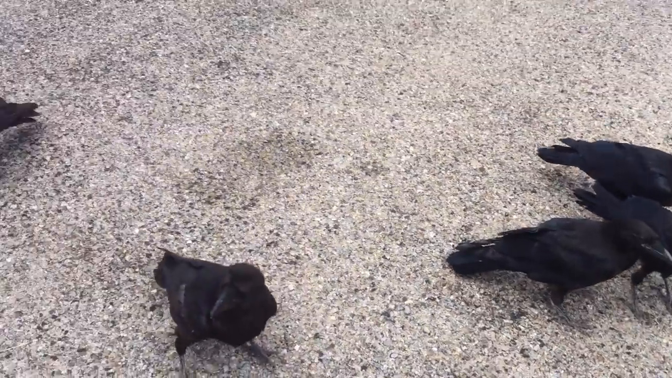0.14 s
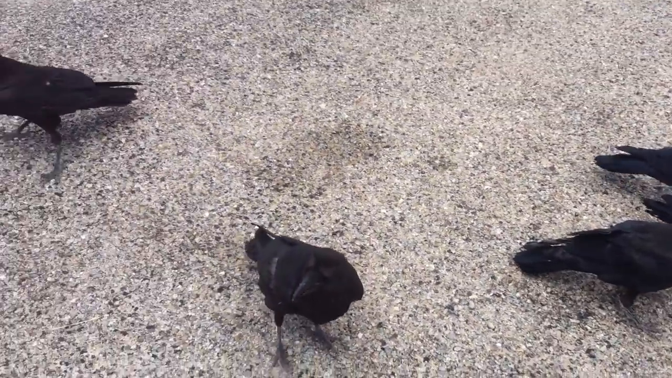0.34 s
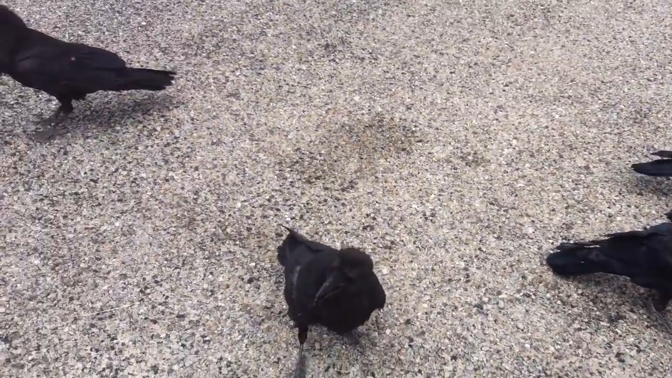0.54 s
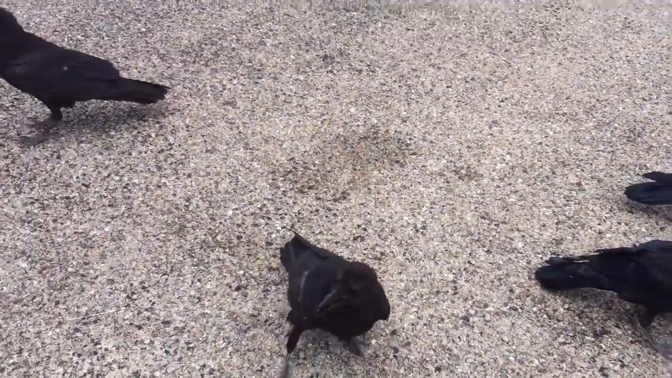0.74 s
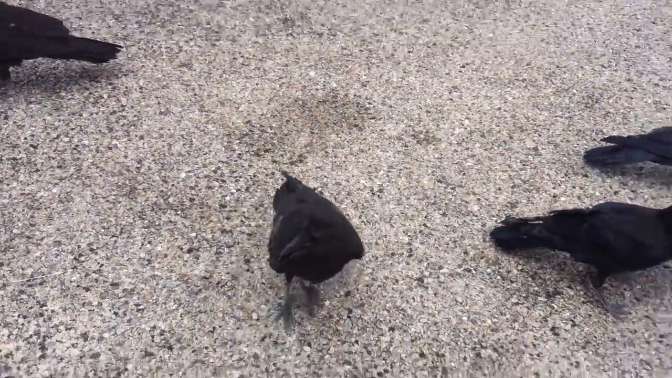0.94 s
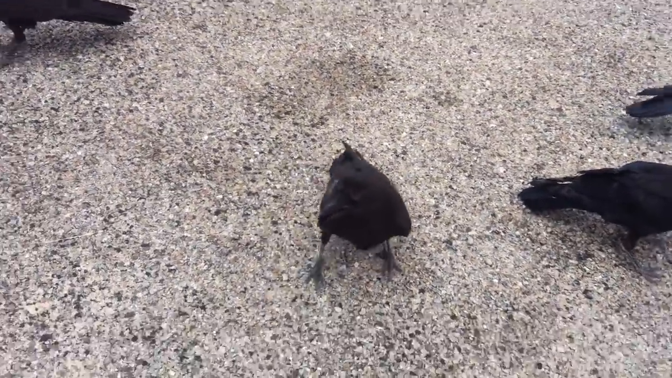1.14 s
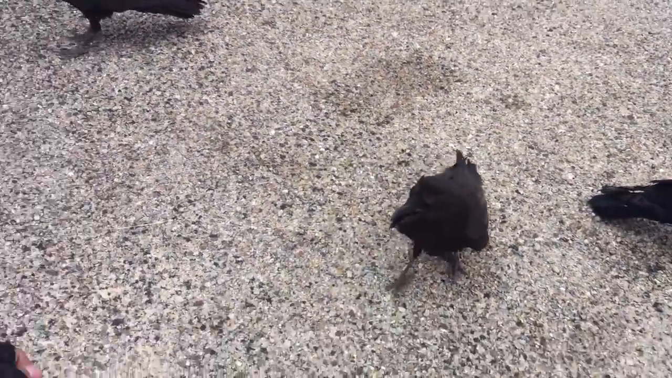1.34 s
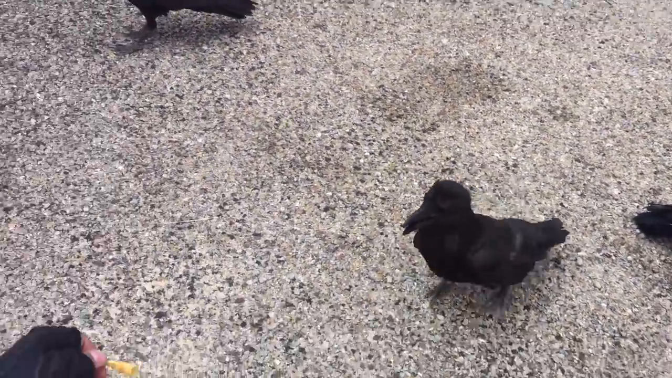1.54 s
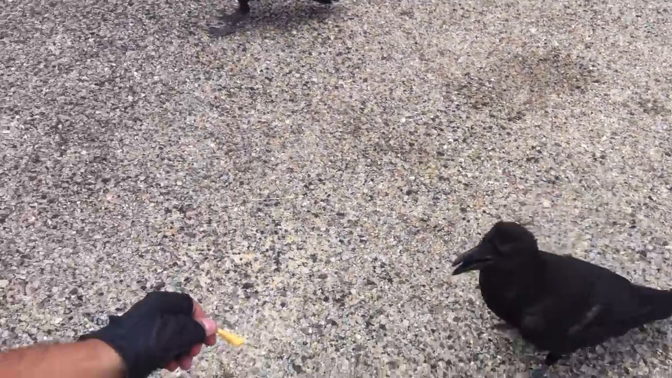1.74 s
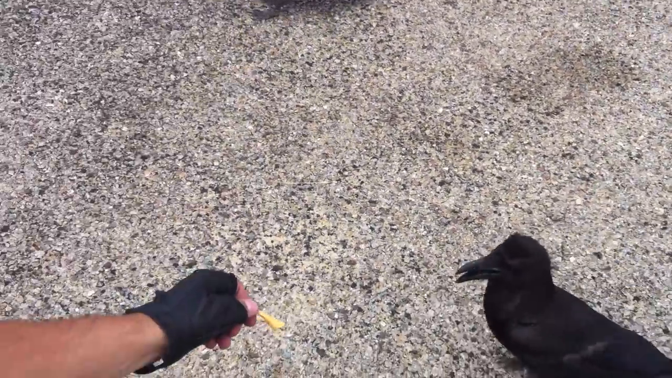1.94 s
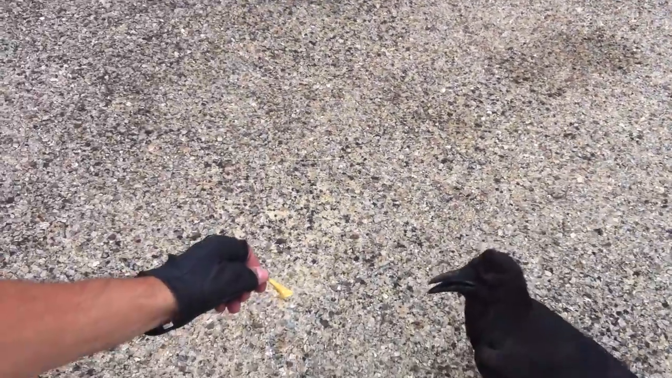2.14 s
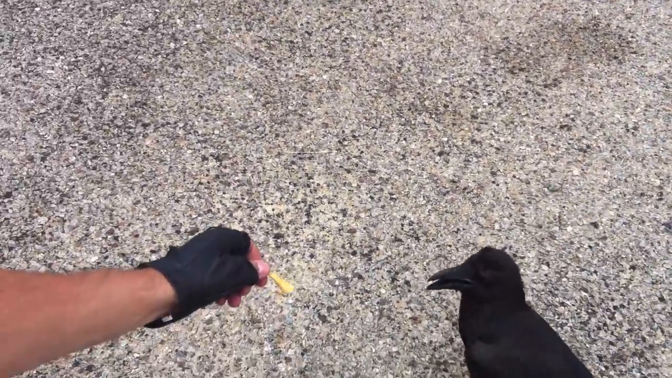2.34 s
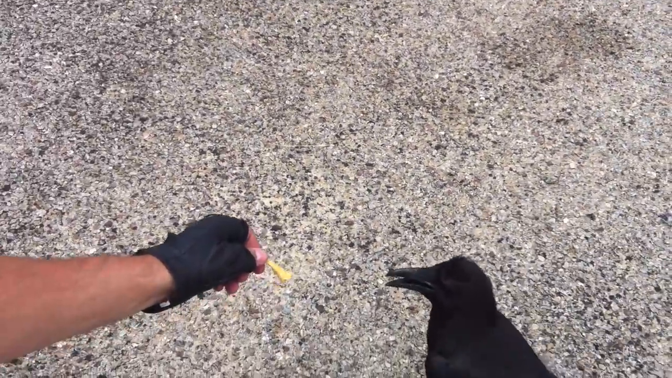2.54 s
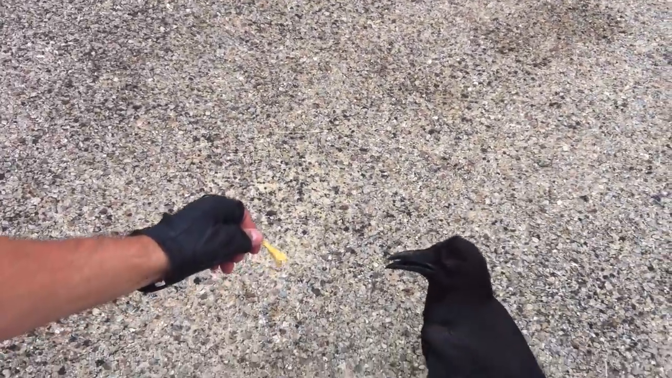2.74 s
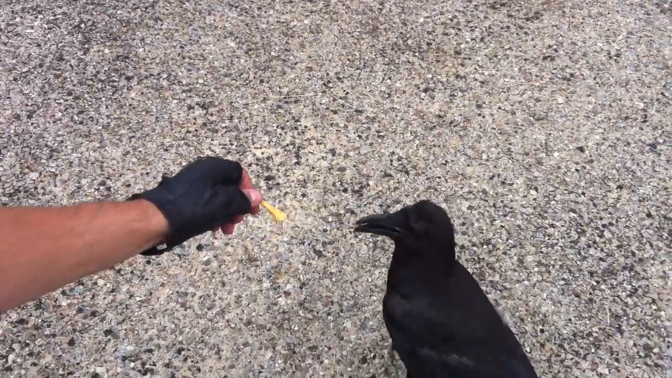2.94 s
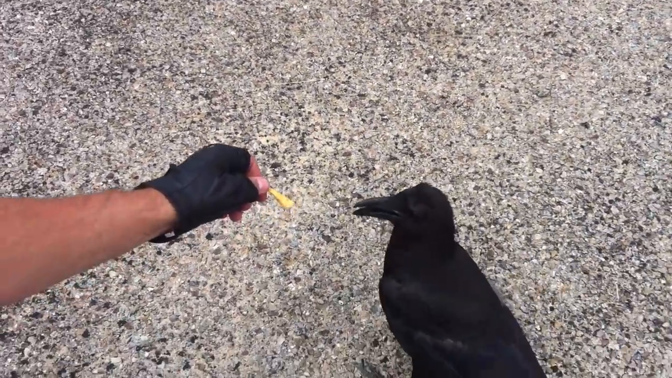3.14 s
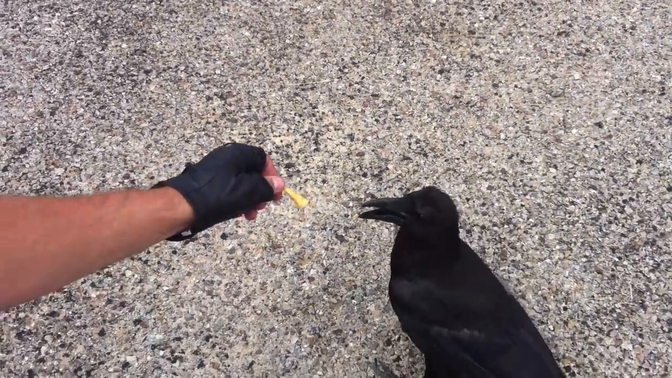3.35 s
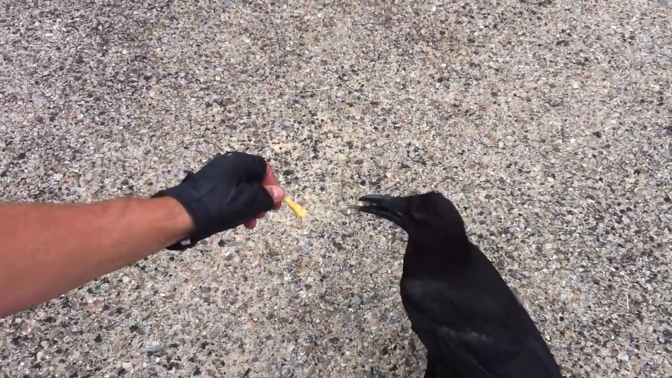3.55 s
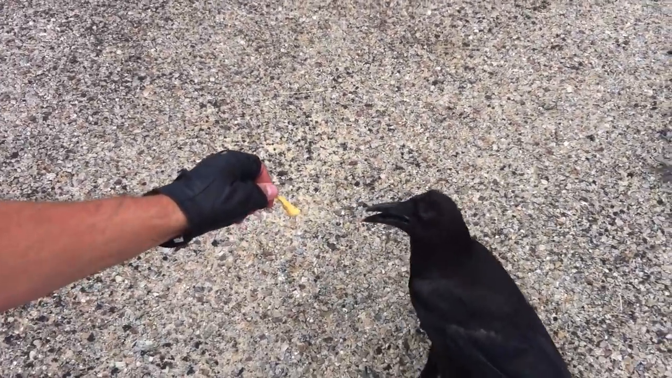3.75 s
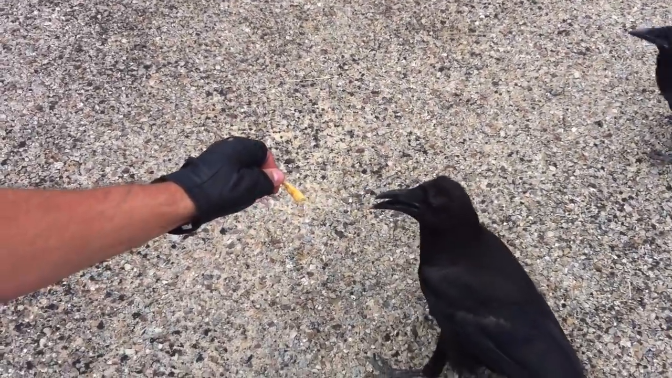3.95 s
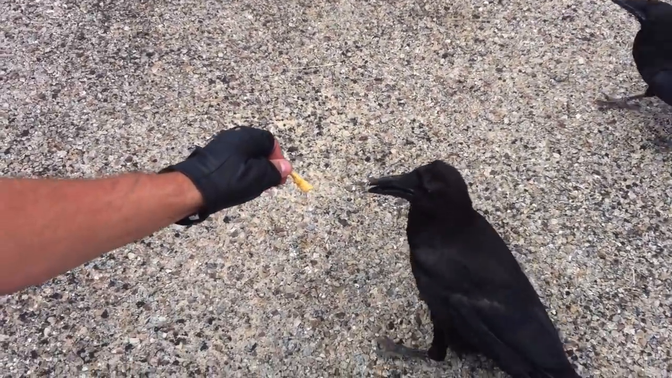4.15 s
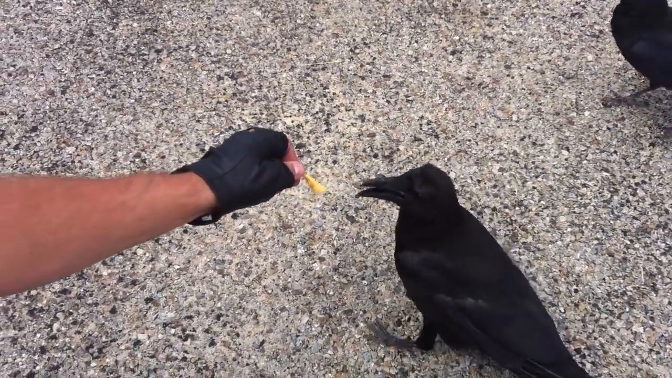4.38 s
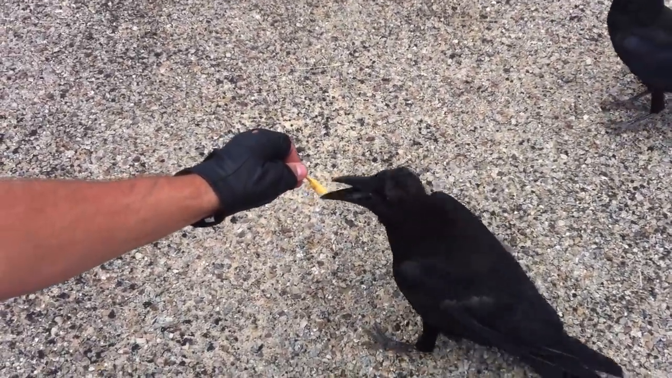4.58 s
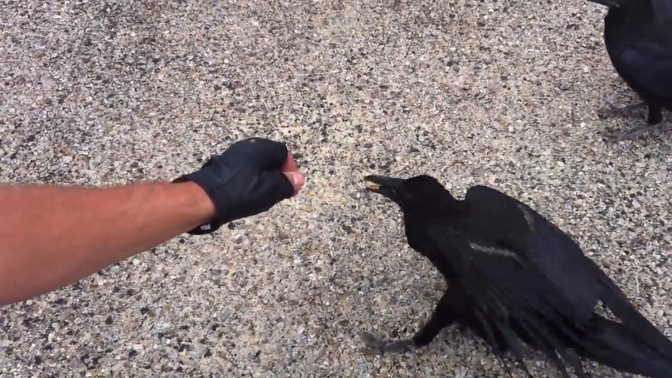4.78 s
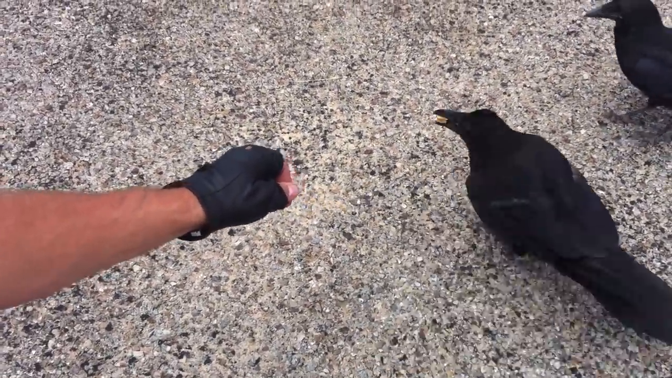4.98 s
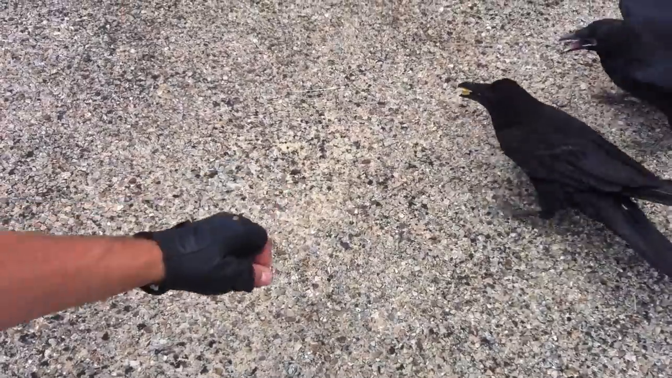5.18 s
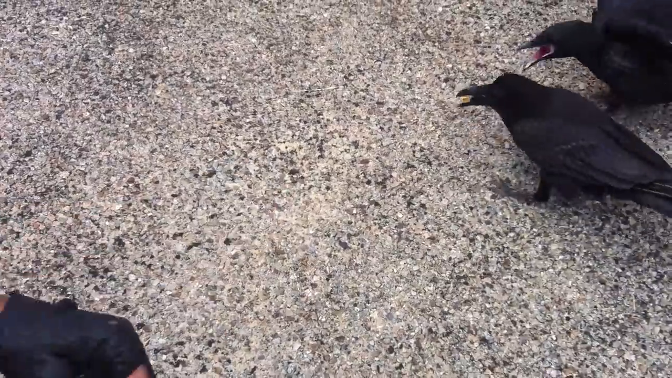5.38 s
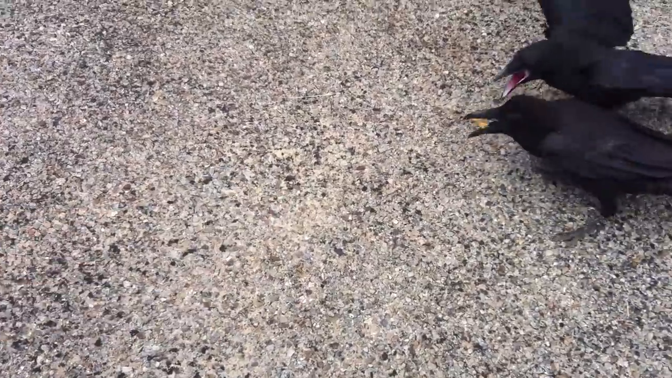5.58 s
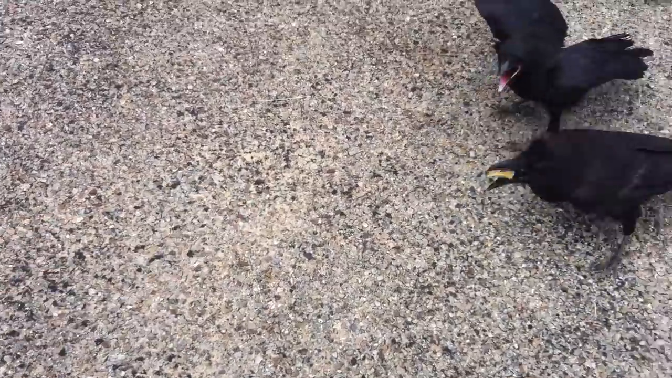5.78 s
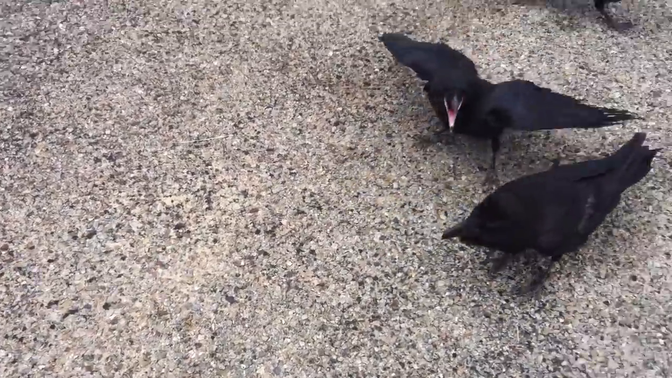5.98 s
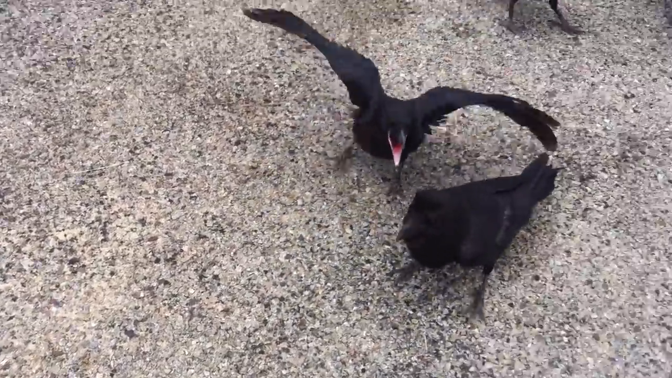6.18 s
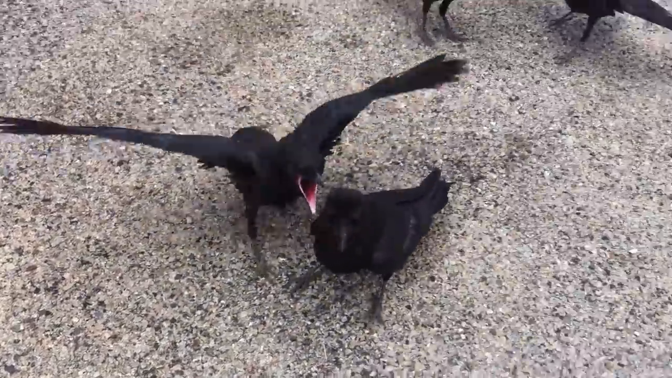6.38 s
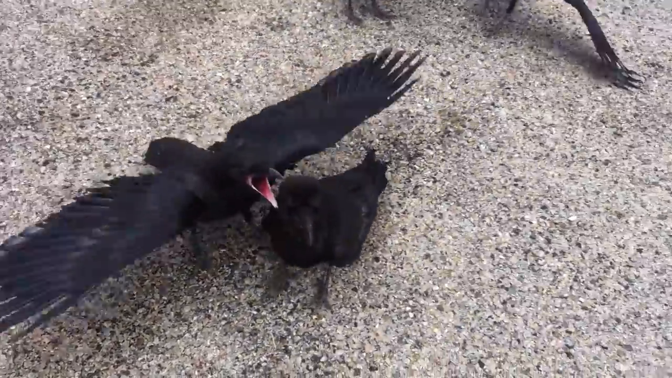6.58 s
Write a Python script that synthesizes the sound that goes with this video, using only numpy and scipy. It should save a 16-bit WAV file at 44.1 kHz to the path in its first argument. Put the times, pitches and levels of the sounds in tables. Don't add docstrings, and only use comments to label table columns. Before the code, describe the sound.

Quiet claw taps and feather rustles on outdoor grit, broken by three loud, hoarse raven caws and a brief scuffle before the final swelling cry.

```python
import sys
import numpy as np
from scipy import signal
from scipy.fft import rfft, irfft
from scipy.io import wavfile
from scipy.ndimage import uniform_filter1d, minimum_filter1d, map_coordinates

SR = 44100
rng = np.random.default_rng(int(sys.argv[2]) if len(sys.argv) > 2 else 0)


def boost(x):
    u = np.asarray(x, float) / 20
    return 10 ** u


def int16_out(signal):
    q = np.round(np.clip(np.atleast_2d(signal).T, -1, 1) * 32767)
    wavfile.write(sys.argv[1], SR, q.astype(np.int16))


N = 291942

# pitch_hz, level_db
HUSH_COLOUR = [(18, -68.5), (30, -34), (65, -32), (91, -17.5), (213, -3.5), (301, -9), (344, -8),
               (460, -11.5), (1440, -12.5), (4500, -15), (16900, -17)]
# start_s, level_db
GUST_LEVELS = [(0, -70.5), (.72, -78), (1.31, -70), (1.49, -75), (2.38, -77), (3.9, -80.5), (4.61, -83),
               (4.9, -69), (5.2, -75), (5.75, -67), (5.85, -60), (6.12, -58), (6.27, -53), (6.5, -67),
               (6.62, -43)]
# pitch_hz, level_db
GUST_COLOUR = [(41, -51.5), (70, -19.5), (117, -9.5), (215, -1), (495, -3), (626, -3), (900, -10),
               (1170, -33), (1980, -120)]
# start_s, pitch_hz, level_db
MOTOR_HUM = [
    (0, 525, -75),
    (.4, 515.5, -74.5),
    (.8, 513, -76),
    (1.0, 507, -84),
]
# start_s, length_s, level_db, edge_s
FAR_CAW = (2.7, .18, -68, .06)
# start_s, rise_s, length_s, peak_db, slope_db_per_s after the peak
RUSTLES = [
    (0, 0.016, 0.25, -62.5, -31),
    (4.739, 0.13, .56, -58, -36.5),
    (5.791, 0.078, .46, -53, 11),
]
# pitch_hz, level_db
FEATHER_COLOUR = [(59, -22), (100, -9), (338, -2), (778, -12), (865, 3.5), (1050, -0.5), (1640, 0),
                  (3780, -3), (11700, -2.5), (16500, -6.5)]
# start_s, peak_db, tip_db (extra ring of the beak tip)
BEAK_CLACKS = [
    (0.0229, -54, -11.5),
    (2.0014, -43, -31),
    (3.1683, -44.5, -29),
    (4.5987, -44.5, -21.5),
    (4.7858, -42, -6),
    (4.8018, -60, -10),
]
# pitch_hz, level_db, longest t60_s (held to 32 / pitch_hz s at most)
BEAK_RING = [(1394, -8, 0.12), (1800, 0.5, 0.19), (3470, -3.5, 5.0), (4360, -6, 0.13), (6848, -20, 0.075),
             (8460, -15, 0.069), (8670, 1, 0.46), (9260, 12, 0.36), (12300, -0.5, 0.45)]
# low_hz, high_hz
BEAK_TIP_BAND = (3800, 4500)
# start_s, thud_db, knock_db, fizz_db
FOOTSTEPS = [(.049, -64, -51, -62), (0.073, -45.5, -48, -47.5), (.136, -37.5, -42, -58),
             (0.149, -40, -32, -35.5), (.169, -36, -41, -50), (0.22, -67, -52.5, -69),
             (.269, -53, -68, -65), (.37, -76, -49.5, -65), (.452, -51, -52.5, -68), (.734, -55, -78, -64),
             (.827, -42, -46.5, -47.5), (.851, -49.5, -65, -66), (.913, -41, -39.5, -72),
             (.922, -41.5, -65, -50), (1.312, -42.5, -50.5, -49), (2.217, -77, -51, -74),
             (2.229, -52, -50, -64), (4.742, -53, -42, -49)]
# start_s, fizz_db
CLAW_SCRATCHES = [(0.692, -53), (1.489, -50.5), (1.561, -51.5), (1.624, -41), (1.789, -50), (1.849, -53),
                  (1.981, -47.5), (2.185, -47), (2.286, -49.5), (2.343, -47.5), (2.552, -50.5),
                  (2.997, -45.5), (3.03, -40.5), (4.38, -43), (4.508, -47), (4.516, -47.5), (4.666, -45),
                  (4.675, -47.5), (4.775, -45), (4.784, -31), (4.802, -37), (4.959, -40.5), (4.974, -47),
                  (5.124, -45), (5.181, -49), (5.231, -51.5)]
# start_s, knock_db, fizz_db
SCUFFLES = [(5.817, -40, -43.5), (5.867, -43, -46), (5.881, -38.5, -34), (5.92, -51, -34.5),
            (5.957, -49.5, -31.5), (5.965, -39, -57), (6.007, -46, -32.5), (6.02, -36.5, -30),
            (6.046, -38, -52), (6.154, -38.5, -34.5), (6.21, -36, -32.5), (6.242, -40, -34)]
# time_s, level_db
CAW_LOUDNESS = [
    [(3.345, -127), (3.355, -36.5), (3.387, -21), (3.477, -18), (3.617, -18.5), (3.733, -20),
     (3.759, -35.5), (3.775, -72)],
    [(5.41, -112), (5.418, -35.5), (5.444, -20), (5.494, -18.5), (5.748, -18), (5.772, -25.5), (5.79, -56)],
    [(6.19, -71), (6.21, -49), (6.277, -36), (6.288, -26), (6.325, -19.5), (6.424, -13), (6.62, -12)],
]
# high_opens_s, both_close_s, high_hz, low_opens_s, low_hz
VOICE_SIDES = [
    (3.346, 3.751, 988.6, 3.35, 807.7),
    (5.41, 5.773, 985.8, 5.38, 807.3),
    (6.36, 6.9, 975.3, 6.27, 802.8),
]
# flutter_hz at the start, slowing_hz_per_s, high_over_low_db, bright_db above 2 kHz
CAW_MANNER = [
    (82.63, 24, -2, -6),
    (77.82, 20.4, 0.5, -4),
    (85.86, 60, 0, -4.5),
]
CAW_ROUGHNESS = [.22, .33, .38]
# depth_nepers, swing_hz, second_beat_share, loudness_lag_rad
CAW_FLUTTER = [(.5, 26, .1, .9), (.55, 34, .3, .9), (.35, 40, .2, .9)]
LOW_ORDERS = [(1, 0), (0, 1), (0, 2), (1, 1), (2, 0), (0, 3)]
LOW_TONES = [(-1.5, -18.5, -9.5, -16.5, -8.5, -24), (-6, -24, -5, 0, -3, -24),
             (-5.5, -14.5, -2, -2, -1.5, -30)]
UPPER_ORDERS = [(1, 2), (2, 1), (3, 0), (0, 4), (1, 3), (2, 2), (4, 0), (1, 4), (2, 3), (4, 1), (0, 6),
                (5, 0), (2, 4), (5, 1), (6, 0), (4, 3), (6, 1), (7, 0), (7, 1), (8, 0)]
UPPER_TONES = [(-5, 3, -2, -12.5, -6, -4, -1, 7.5, -11, -9.5, 6, -1.5, 8.2, 2, -2, 1, -3, -3.5, -10.5, 4.5),
               (-7, 6, 0, -2, -30, -7, 2, -2, 2, 5, -1.5, -5, 4.3, -8, -5.5, -2, -15, -12, -11, -2),
               (7, 3.5, -39, 1.5, -15, -1.5, 0, 6, -24.5, 1, 3, -2, 7.7, 6.5, -15, 0.5, 1, 6.5, -2, 6)]
# pitch_hz, level_db
WINDPIPE = [(400, -60), (620, -33), (740, -9), (820, 0), (1120, -1.5), (1260, -7), (1400, -1.5),
            (2050, -2.5), (2300, -6.5), (2700, -5), (3500, -36.5)]
# pitch_hz, level_db
UPPER_THROATS = [
    [(1290, -38.5), (2200, -6.5), (3020, -5), (3280, 2.5), (3770, -9), (4240, -5), (5130, -10.5),
     (6470, -12.5), (7090, -19.5), (8240, -17), (9330, -27.5), (16000, -42)],
    [(1290, -49.5), (2200, -9), (2510, -13), (2750, -4.5), (3120, 4.5), (4100, -13), (4720, -2), (5170, -8),
     (6010, -4), (6640, -13.5), (10200, -23.5), (16000, -34.5)],
    [(1290, -28.5), (2200, -9), (2710, -1.5), (3330, -4), (4030, -2.5), (4720, -4), (6530, -11),
     (7150, -13), (9560, -15), (11000, -18), (14600, -29.5), (16000, -64)],
]
# time_s, extra_path_ms, strength (0-1)
GRAVEL_BOUNCE = [
    [(3.34, 1, 0.5), (3.45, .94, 0.93), (3.6, 0.884, 0.1), (3.78, 0.88, 0.66)],
    [(5.4, 0.93, 0.2), (5.5, 0.89, 0.46), (5.63, 0.82, 0.33), (5.8, 0.83, 0)],
    [(6.18, 0.574, 0.44), (6.4, 0.63, 0.14), (6.48, .8, 0), (6.63, 0.75, 0.15)],
]
# delay_s, level_db, t60_s
WALL_RETURNS = [
    (0.25, -43, 0.45),
    (0.019, -35, 0.74),
]

HIGH_SLACK_HZ, HIGH_TIGHTEN_S, LOW_SLACK_HZ, LOW_TIGHTEN_S = 199.85, 0.068, 155.16, 0.11
SHUT_SAG_HZ, SHUT_S, LOW_SHUT_SHARE, MOST_SAG_HZ = 224, 0.029, 0.42, 302.6


def evened(x):
    return x / np.sqrt(np.mean(abs(x) ** 2) + 1e-20)


def steady(x):
    power = uniform_filter1d(uniform_filter1d(x ** 2, size=1500), size=1500)
    return x / np.sqrt(power + 1e-12)


def add(mix, start_s, sound):
    part = mix[max(round(start_s * SR), 0):][:len(sound)]
    part += sound[:len(part)]


def noise(size):
    return rng.standard_normal(size)


def coloured(x, points):
    hz, db = np.transpose(points)
    f = np.fft.rfftfreq(len(x), 1 / SR)
    curve_db = np.interp(np.log(f + 1), np.log(hz + 1), db, -90, -90)
    return irfft(rfft(x) * boost(curve_db), len(x))


def band(x, low_hz, high_hz):
    edges = [low_hz, min(high_hz, SR / 2.1)]
    return signal.sosfilt(signal.butter(2, edges, "band", fs=SR, output="sos"), x)


def wander(size, hz):
    r = np.exp(-2 * np.pi * hz / SR)
    z = noise(size) + 1j * noise(size)
    once = signal.lfilter([1], [1, -r], z)
    return evened(signal.lfilter([1], [1, -r], once))


def turning(hz):
    return 2 * np.pi * np.cumsum(hz) / SR


def along(rows):
    s, *columns = np.transpose(rows)
    t = np.arange(s[0], s[-1], 1 / SR)
    return t, [np.interp(t, s, column) for column in columns]


def air(caws):
    flicker = boost(0.95 * wander(N, 30).real)
    out = boost(-65.5) * evened(coloured(noise(N) * flicker, HUSH_COLOUR))

    s, db = np.transpose(GUST_LEVELS)
    wind = boost(np.interp(np.arange(N) / SR, s, db) - 2.0)
    puffs = boost(-47.5) * np.sqrt(abs(uniform_filter1d(caws ** 2, size=2000)))
    lumps = boost(3.0 * wander(N, 12).real)
    out += (wind + puffs) * evened(coloured(noise(N) * lumps, GUST_COLOUR))

    t, (hz, hum_db) = along(MOTOR_HUM)
    hum = (wander(len(t), 15) * np.exp(1j * turning(hz))).real
    add(out, t[0], boost(hum_db) * hum)

    start_s, length_s, far_db, edge_s = FAR_CAW
    t = np.arange(0, length_s, 1 / SR)
    shape = np.minimum(np.minimum(t, length_s - t) / edge_s, 1)
    add(out, start_s, boost(far_db) * shape * evened(band(noise(len(t)), 490, 1150)))
    return out


def rustle():
    out = np.zeros(N)
    for start_s, rise_s, length_s, peak_db, slope_db in RUSTLES:
        t = np.arange(0, length_s, 1 / SR)
        clumps = boost(3.2 * wander(len(t), 70).real + 3 * wander(len(t), 14).real)
        rub = evened(coloured(noise(len(t)) * clumps, FEATHER_COLOUR))
        swell = np.minimum(t / rise_s, 1) * boost(peak_db + slope_db * np.maximum(t - rise_s, 0))
        add(out, start_s, swell * rub * signal.windows.tukey(len(t), 0.03))
    return out


def clacks():
    out, t = np.zeros(N), np.arange(4000) / SR
    ring = np.zeros(len(t))
    for hz, db, t60_s in BEAK_RING:
        ring += boost(db - 60 * t / min(t60_s, 32 / hz)) * np.sin(2 * np.pi * hz * t)
    for start_s, peak_db, tip_db in BEAK_CLACKS:
        puff = noise(len(t)) * boost(-60 * t / 0.13) * np.minimum(t / 0.0024, 1)
        clack = signal.oaconvolve(puff, ring)[:len(t)] + 7 * band(puff, 2500, 14500)
        tip = band(puff, *BEAK_TIP_BAND)
        both = clack / abs(clack).max() + boost(tip_db + 8) * tip / abs(tip).max()
        add(out, start_s - 0.003, boost(peak_db) * both)
    return out


def gravel():
    out, t = np.zeros(N), np.arange(3000) / SR
    rows = [(*row, 0.029) for row in FOOTSTEPS]
    rows += [(s, fizz_db - 16, fizz_db - 12.5, fizz_db, 0.021) for s, fizz_db in CLAW_SCRATCHES]
    rows += [(s, knock_db - 18, knock_db, fizz_db, 0.015) for s, knock_db, fizz_db in SCUFFLES]
    for start_s, thud_db, knock_db, fizz_db, t60_s in rows:
        burst = noise(len(t)) * boost(-60 * t / t60_s) * np.minimum(t / 0.0025, 1) ** 2
        layers = ((thud_db, 180, 800), (knock_db, 620, 2520), (fizz_db, 5800, 15500))
        for db, low_hz, high_hz in layers:
            part = band(burst, low_hz, high_hz)
            add(out, start_s - 0.001, boost(db) * part / abs(part).max())
    return out


def sides(t, high_s, shut_s, high_hz, low_s, low_hz):
    shut = np.minimum(SHUT_SAG_HZ * np.exp((t - shut_s) / SHUT_S), 1.5 * SHUT_SAG_HZ)
    opening = HIGH_SLACK_HZ * np.exp((high_s - t) / HIGH_TIGHTEN_S)
    slack = np.minimum(opening, MOST_SAG_HZ) + shut
    low_slack = LOW_SLACK_HZ * np.exp(np.minimum(low_s - t, 0) / LOW_TIGHTEN_S)
    return high_hz - slack, low_hz - low_slack - LOW_SHUT_SHARE * shut, slack, shut


def bounced(x, t, rows):
    s, path_ms, strength = np.transpose(rows)
    late, here = np.interp(t, s, path_ms) * SR / 1e3, np.arange(len(x))
    ground = map_coordinates(x, [here - late], order=3)
    body = map_coordinates(x, [here - 2.25 * late], order=3)
    return x + np.clip(np.interp(t, s, strength), 0, 1) * (ground + 0.4 * body)


def caw(loudness, folds, manner, tight_rough, low_db, upper_db, throat, bounce, flutter):
    t, (loud_db,) = along(loudness)
    size = len(t)
    high_hz, low_hz, slack, shut = sides(t, *folds)
    start_hz, slowing_hz, lead_db, open_db = manner
    depth, swing_hz, uneven, lag = flutter

    rough = tight_rough + 0.045 * np.clip(loud_db.max() - 6 - loud_db, 0, 15)
    rough = rough + 0.002 * slack * (slack < HIGH_SLACK_HZ)
    balance_db = lead_db - 26 * (slack / HIGH_SLACK_HZ) ** 1.6
    lone_hz = np.maximum(slack - shut - HIGH_SLACK_HZ, 0)
    bright_db = open_db - 0.0136 * shut - 0.02 * lone_hz

    flutter_hz = start_hz - slowing_hz * (t - t[0])
    beat = turning(flutter_hz * (1 + 0.11 * rough * wander(size, 26).real))
    shake = np.sin(beat) + 0.41 * np.sin(2 * beat + 0.39) + uneven * np.sin(beat / 2)
    high = turning(high_hz + swing_hz * shake + 12 * rough * wander(size, 40).real)
    low = turning(low_hz + 0.8 * swing_hz * np.cos(beat) + 18 * rough * wander(size, 43).real)

    def throb(late):
        return evened(np.exp(depth * (np.cos(beat - late) + uneven * np.cos(beat / 2))))

    def stack(orders, levels_db, skirt_hz, blur):
        out = np.zeros(size)
        for (m, n), db in zip(orders, levels_db):
            gain = boost(db + m * balance_db / (m + n) ** 2) * throb(lag + 2.6 * (m + n - 1))
            phase = m * high + n * low + 0.96 * m * n + 0.3 * (m + n) ** 2
            skirt = 1 + blur * wander(size, skirt_hz)
            out += gain * (skirt * np.exp(1j * phase)).real
        return out

    breath = boost(-22) * (1 + 3 * rough + 5 * rough ** 3) * evened(band(noise(size), 750, 2200))
    body = coloured(steady(stack(LOW_ORDERS, low_db, 110, rough)) + breath, WINDPIPE)

    hiss = (0.2 + rough) * noise(size)
    hiss += boost(5.5) * evened(band(noise(size), 7600, 16000))
    upper = evened(stack(UPPER_ORDERS, upper_db, 150, rough + 0.22))
    rasp = coloured(upper + hiss * throb(lag) ** 0.26, throat)

    croak = boost(-9.5) * (rough - 0.45 * tight_rough) ** 3 * evened(band(noise(size), 560, 700))
    voice = steady(body) + croak + boost(bright_db) * steady(bounced(rasp, t, bounce))
    fade = signal.windows.tukey(size + 200, 0.02)[:size]
    return t[0], boost(loud_db) * voice * fade


def wall(x):
    t = np.arange(SR // 2) / SR
    out = np.zeros(N)
    for delay_s, db, t60_s in WALL_RETURNS:
        smear = noise(len(t)) * boost(-60 * t / t60_s) * np.minimum(t / 0.011, 1)
        add(out, delay_s, boost(db) * signal.oaconvolve(x, smear / np.linalg.norm(smear)))
    moving_air = 1 + 0.25 * wander(N, 40).real
    return band(out * moving_air, 1400, 3000)


def scene():
    caws = np.zeros(N)
    for parts in zip(CAW_LOUDNESS, VOICE_SIDES, CAW_MANNER, CAW_ROUGHNESS, LOW_TONES, UPPER_TONES,
                     UPPER_THROATS, GRAVEL_BOUNCE, CAW_FLUTTER):
        add(caws, *caw(*parts))
    return (air(caws) + rustle() + clacks() + gravel() + caws + wall(caws))[None]


def low_pass(x):
    return signal.sosfilt(signal.butter(12, 17080, fs=SR, output="sos"), x)


def record(dry):
    bass_cut = signal.butter(2, 60, "high", fs=SR, output="sos")
    bent = signal.sosfilt(bass_cut, dry) + 0.003 * band(dry[0] ** 2, 60, 700)
    room = np.minimum(0.92 / (abs(bent) + 1e-9), 1)
    lowest = minimum_filter1d(room, size=133)
    gain = uniform_filter1d(uniform_filter1d(lowest, size=66), size=66)
    return low_pass(bent * gain)


dry = scene()
out = record(dry)
int16_out(out)
```